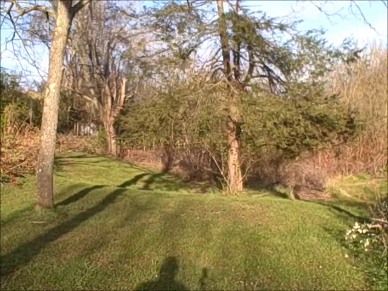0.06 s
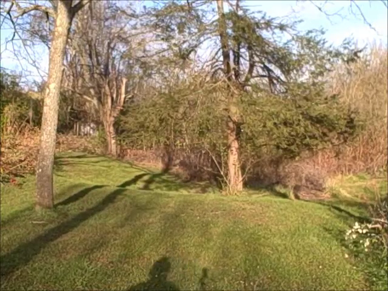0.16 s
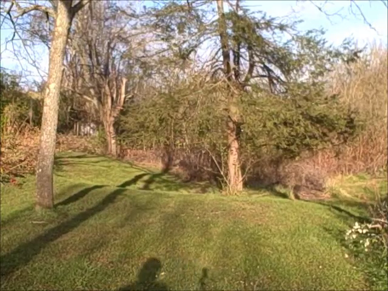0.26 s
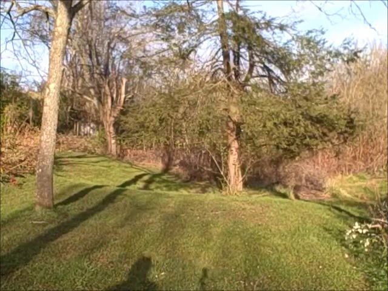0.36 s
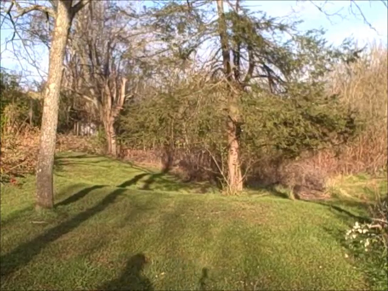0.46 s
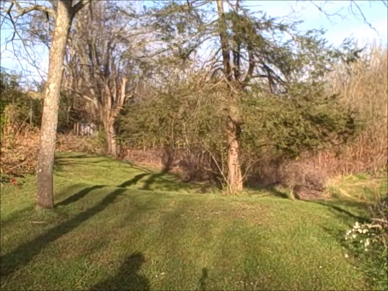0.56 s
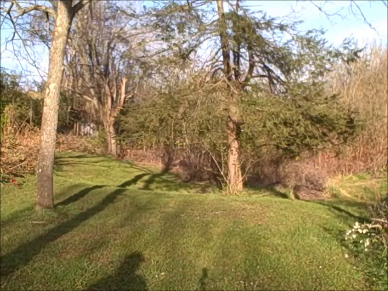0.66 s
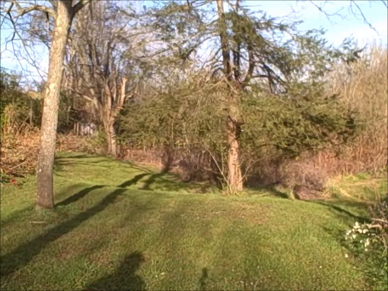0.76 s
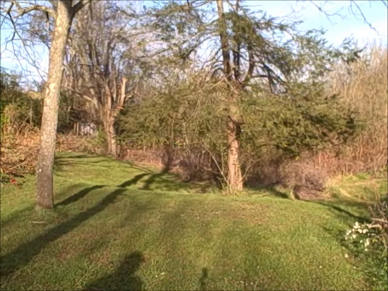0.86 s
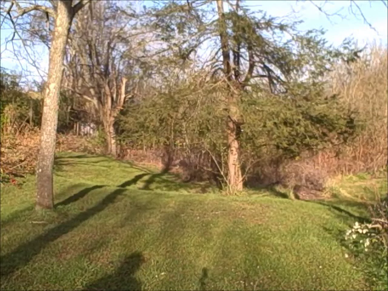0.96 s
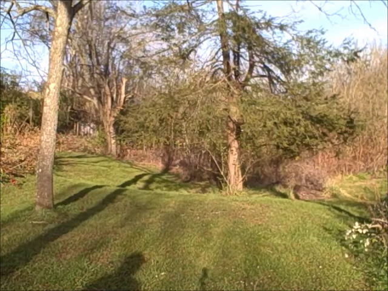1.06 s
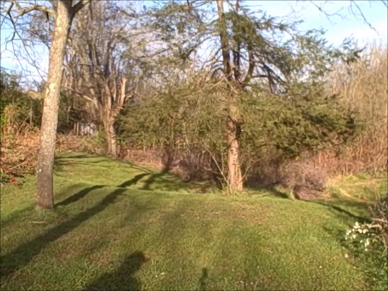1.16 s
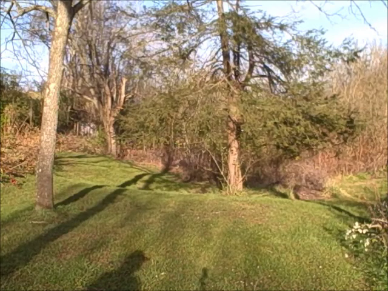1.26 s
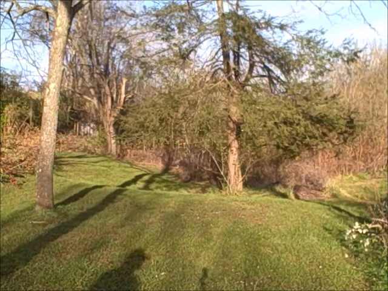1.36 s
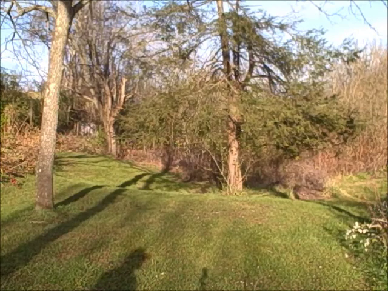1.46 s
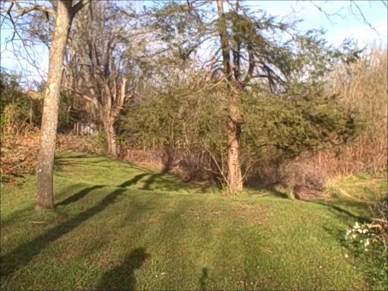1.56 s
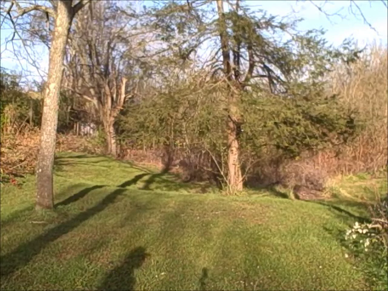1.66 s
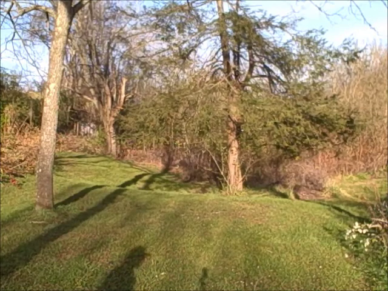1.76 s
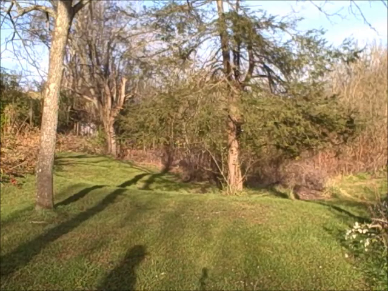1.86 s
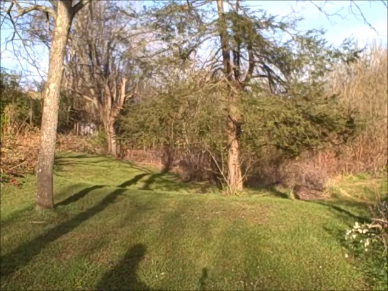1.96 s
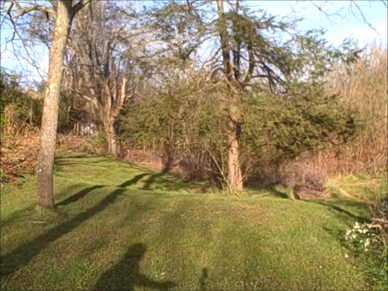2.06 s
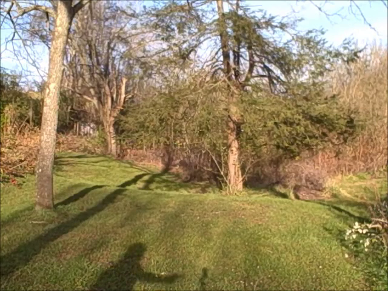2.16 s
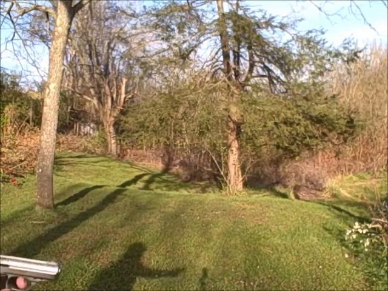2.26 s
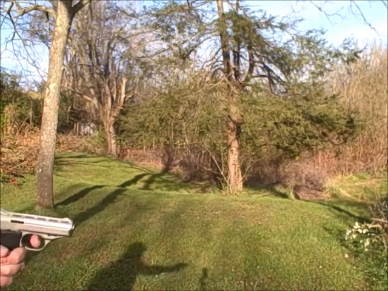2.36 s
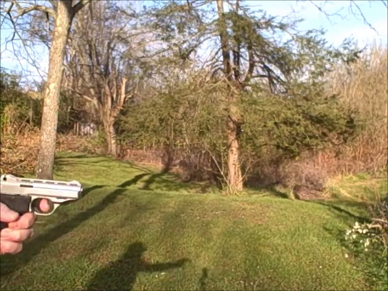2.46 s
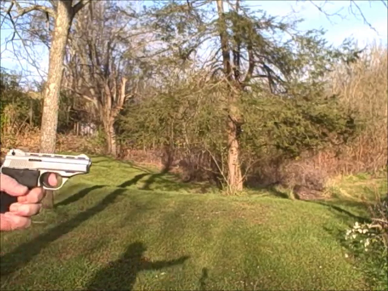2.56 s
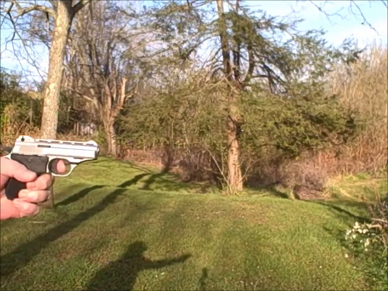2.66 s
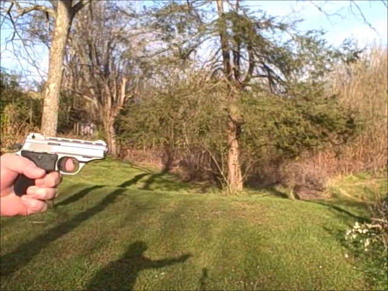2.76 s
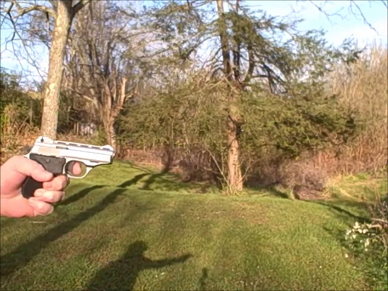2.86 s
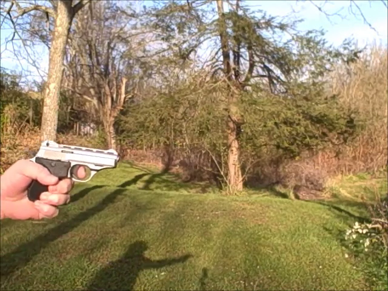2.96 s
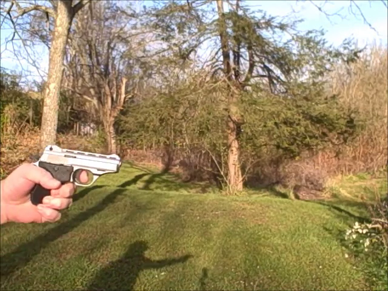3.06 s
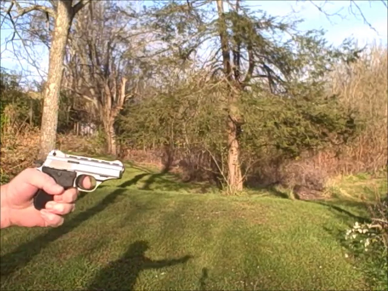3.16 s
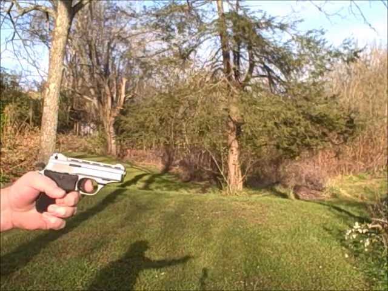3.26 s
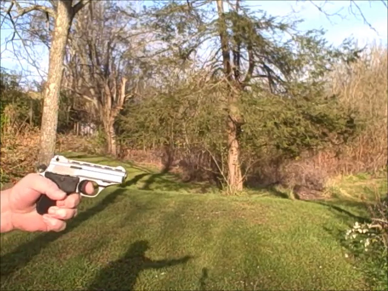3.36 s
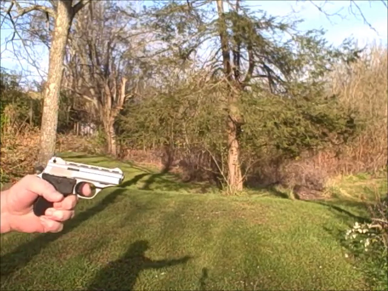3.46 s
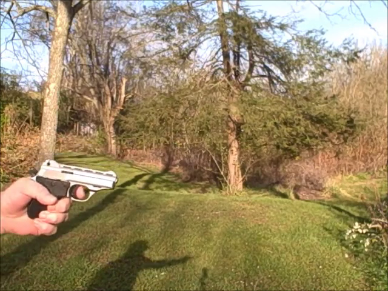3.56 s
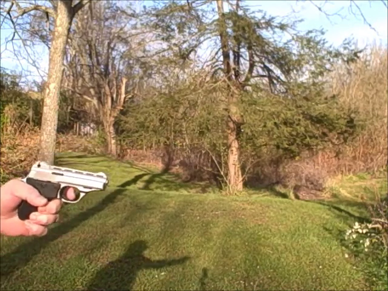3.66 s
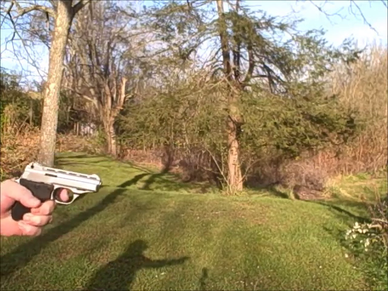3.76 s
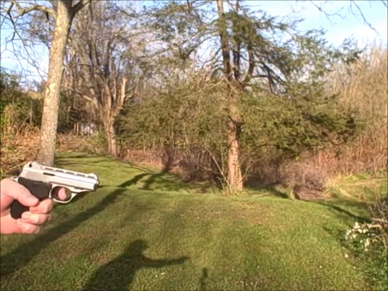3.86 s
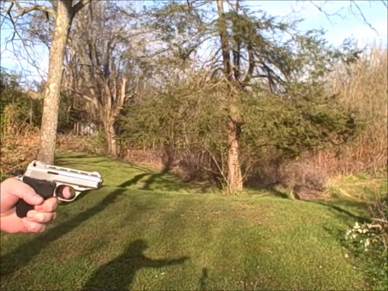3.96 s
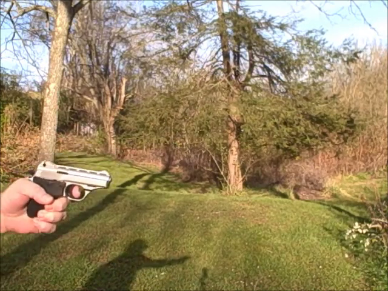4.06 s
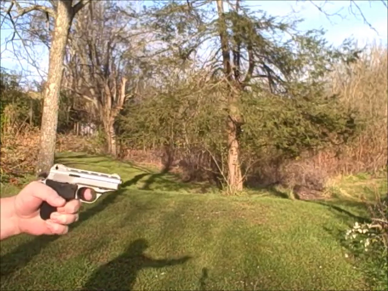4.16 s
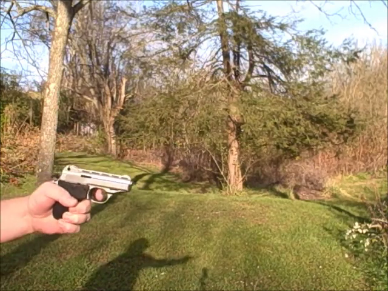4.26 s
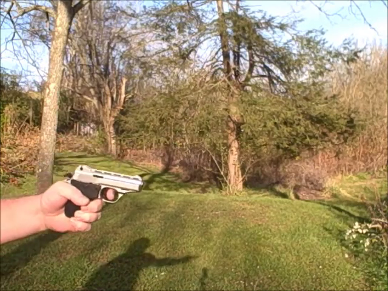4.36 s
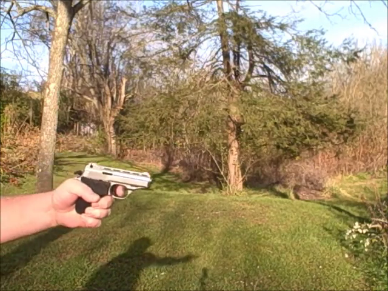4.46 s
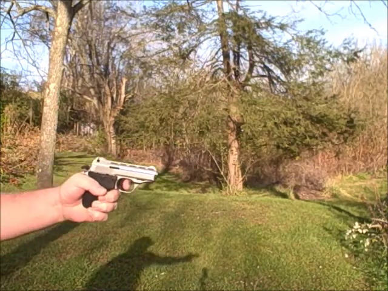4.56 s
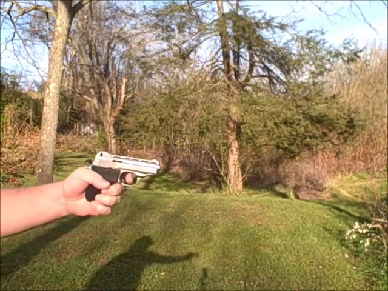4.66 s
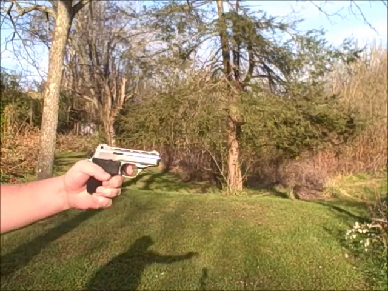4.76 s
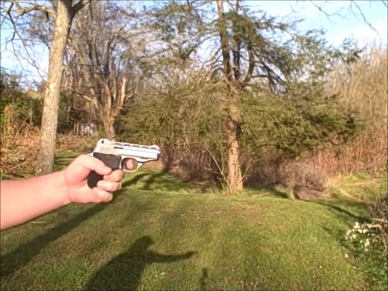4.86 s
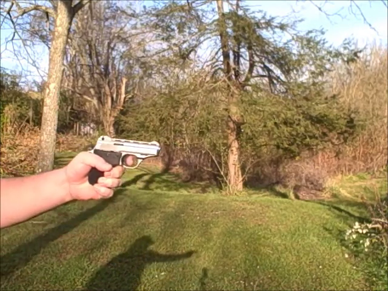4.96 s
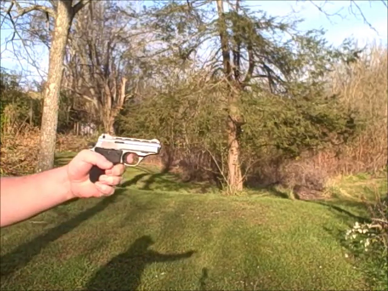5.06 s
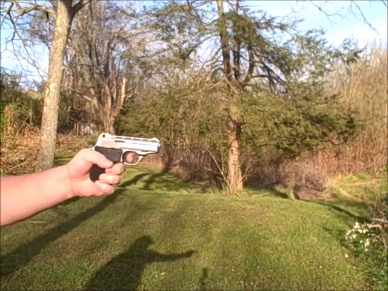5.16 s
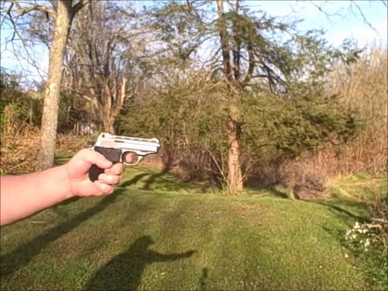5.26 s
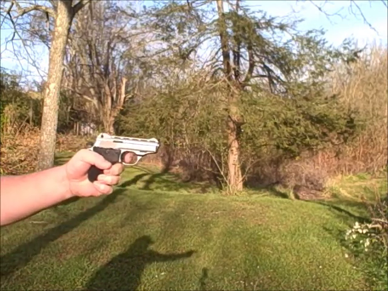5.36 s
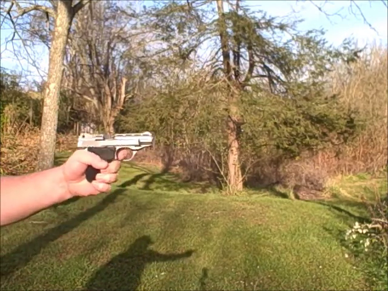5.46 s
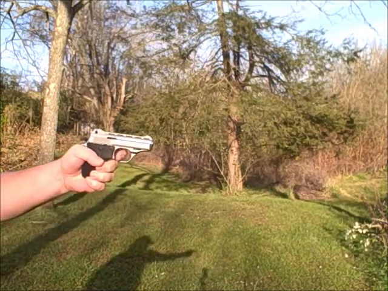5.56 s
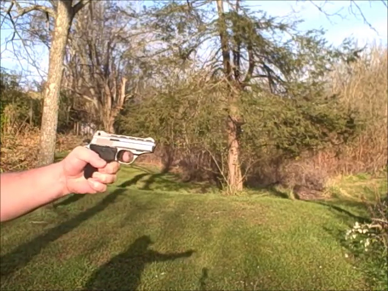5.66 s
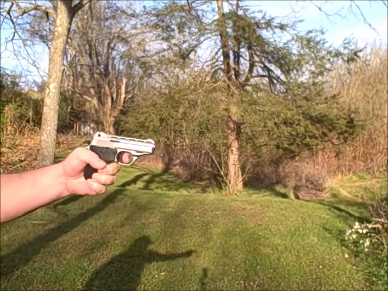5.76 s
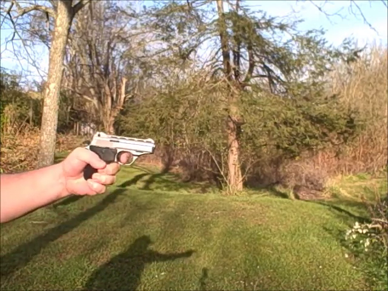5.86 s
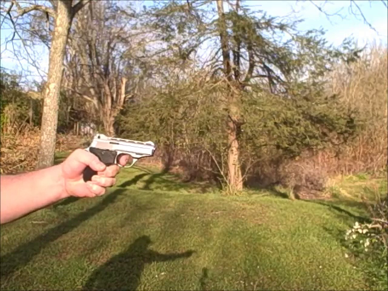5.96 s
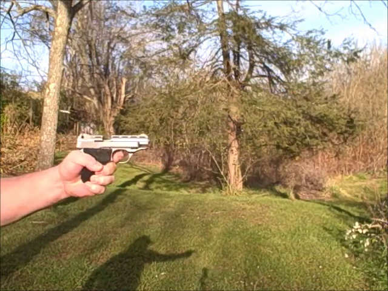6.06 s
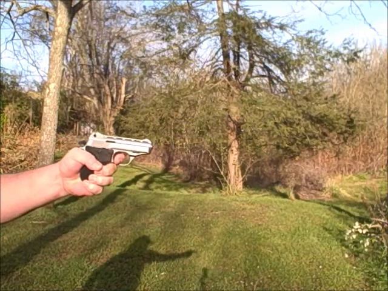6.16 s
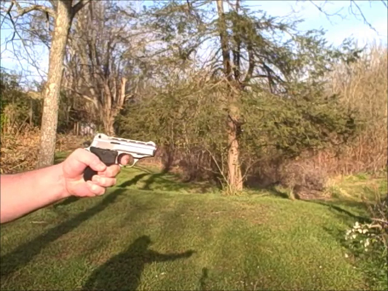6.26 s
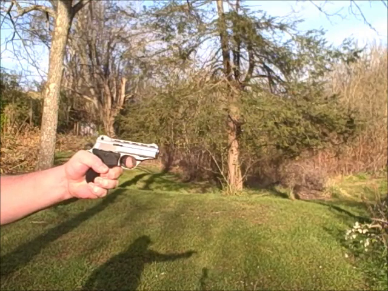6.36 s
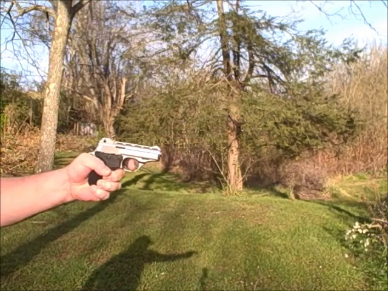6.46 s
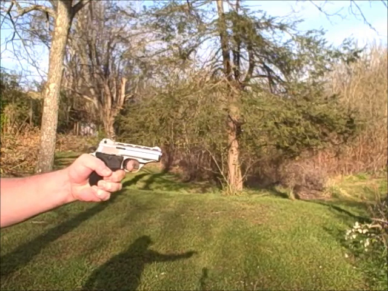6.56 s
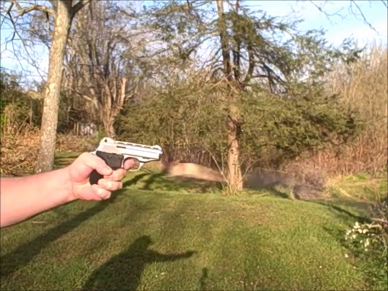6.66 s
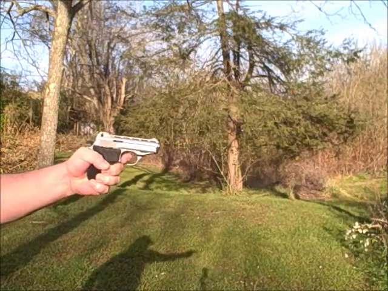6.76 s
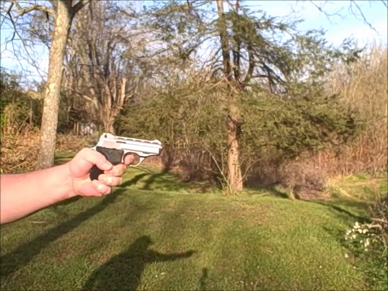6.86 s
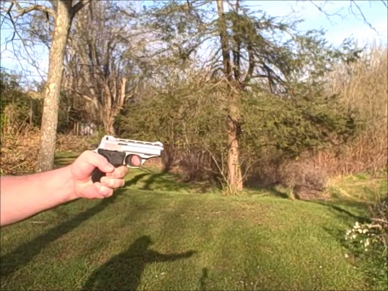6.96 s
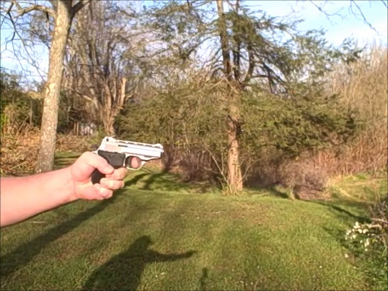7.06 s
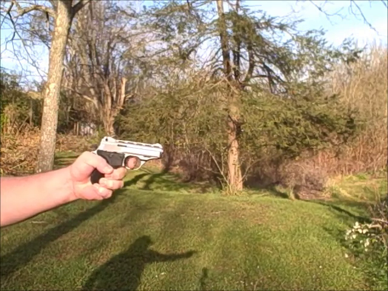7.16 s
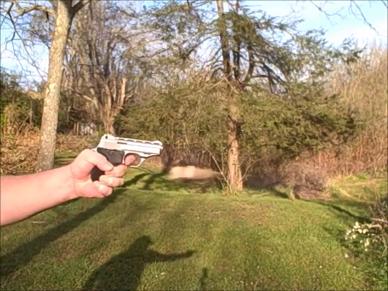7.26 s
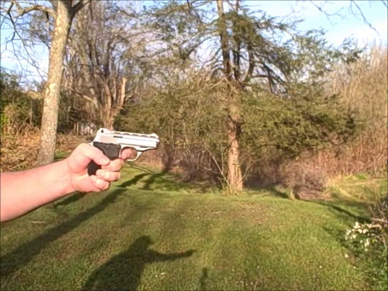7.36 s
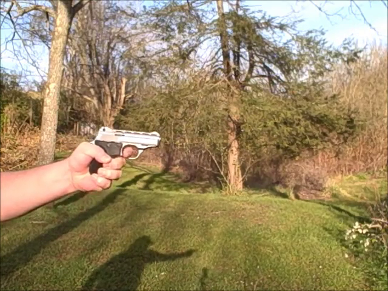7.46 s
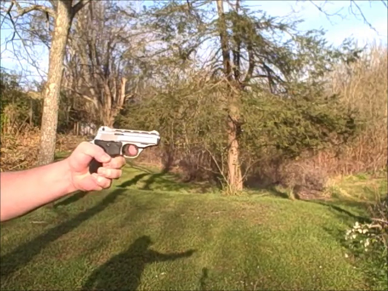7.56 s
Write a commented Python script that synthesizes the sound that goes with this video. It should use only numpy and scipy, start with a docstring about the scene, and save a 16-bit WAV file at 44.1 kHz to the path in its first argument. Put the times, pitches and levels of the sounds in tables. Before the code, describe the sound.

After faint rustling and clicks of handling, a small pistol fires four sharp shots outdoors, each trailing off in a short echo.

```python
"""Four pistol shots on a lawn

A lawn ringed by trees, one microphone an arm's length from a small pistol, an engine droning far off.
A sleeve rustles and the grip ticks and knocks as the gun is raised; then four blasts wake the same echoes.
The recorder overloads and its gain control ducks, so the first shot is the biggest."""
import sys
import numpy as np
from scipy import signal
from scipy.fft import rfft, irfft
from scipy.io import wavfile

SR = 44100
rng = np.random.default_rng(int(sys.argv[2]) if len(sys.argv) > 2 else 0)


def store_wav(level_fs):
    """Save 16-bit WAV to argv[1]."""
    pcm = np.round(np.clip(np.atleast_2d(level_fs), -1, 1) * 32767)
    wavfile.write(sys.argv[1], SR, pcm.T.astype(np.int16))


N = 335160
TIME = np.arange(N) / SR


def from_db(db):
    """Decibels to gain."""
    return 10 ** (np.asarray(db) / 20)


def rms_one(x):
    """Scale to unit rms."""
    return x / np.sqrt(np.mean(x ** 2) + 1e-20)


def at_hz(rows, hz):
    """Each column of a spectrum at the given frequencies."""
    points, *columns = np.transpose(rows)
    return [np.interp(np.log(hz + 1), np.log(points), c) for c in columns]


def cut(x, hz, kind="low", order=2):
    """Butterworth low- or high-pass."""
    return signal.sosfilt(signal.butter(order, hz, kind, fs=SR, output="sos"), x + 1e-18)


def tint(x, spectrum):
    """Give a noise the colour of a spectrum; rms 1."""
    level_db = at_hz(spectrum, np.arange(N // 2 + 1) * SR / N)[0]
    return rms_one(irfft(rfft(x) * from_db(level_db), N))


def grains(spread_db):
    """White noise made of many tiny impulses of unequal size."""
    sizes_db = spread_db * np.minimum(rng.standard_normal(N), 2)
    return rms_one(rng.standard_normal(N) * from_db(sizes_db))


def flicker(spread_db, top_hz):
    """A gain that wavers at random about 1."""
    return from_db(spread_db * rms_one(cut(rng.standard_normal(N), top_hz)))


def swell(centre_s, width_s):
    """A bell-shaped envelope."""
    return np.exp(-((TIME - centre_s) / width_s) ** 2 / 2)


def fade(t60, start=0):
    """An envelope that jumps to 1 and dies away."""
    return (TIME >= start) * from_db(-60 * np.maximum(TIME - start, 0) / t60)


def play(events, response):
    """One response, sounded at every (t/s, level/dB)."""
    out = np.zeros(N)
    for s, db in events:
        at = round(s * SR)
        out[at:] += from_db(db) * response[:N - at]
    return out


def far_engine():
    """A distant engine hums at its firing rate, slows and revs up again."""
    # engine speed and loudness: t/s, firing rate/Hz, level/dB
    revs = [(0, 56.5, -53.5), (.6, 55.2, -56), (1.05, 60.5, -55), (1.25, 62.6, -64), (1.7, 56.1, -58.5),
            (2.3, 53.2, -55), (3.0, 50.7, -51.5), (4.0, 47, -52), (4.85, 46.9, -50.5), (5.05, 56.5, -57),
            (5.45, 80, -59.5), (5.7, 84.8, -48), (7.6, 85.3, -44)]
    s, hz, db = np.transpose(revs)
    phase = 2 * np.pi * np.cumsum(np.interp(TIME, s, hz)) / SR
    return from_db(np.interp(TIME, s, db)) * np.sqrt(2) * np.sin(phase)


def open_air():
    """Low puffs and a soft rumble on the microphone, over the hush of the lawn."""
    # low puffs: t/s, level/dB
    puffs = [(.58, -56), (1.29, -49), (1.47, -57), (1.965, -44), (2.11, -47), (2.5, -46), (4.16, -49),
             (4.42, -51.5), (4.59, -42), (4.8, -52)]
    # spectrum of the still air: f/Hz, level/dB
    hush = [(41, -39.5), (70, -8.5), (174, -20.5), (195, -20.5), (233, -15.5), (268, -21.5), (314, -17.5),
            (351, -19.5), (566, -21.5), (1250, -24.5), (2600, -33.5), (12500, -45.5), (16000, -54)]
    envelope = from_db(-57.5) + sum(from_db(db) * swell(s, width_s=0.033) for s, db in puffs)
    rumble = rms_one(cut(cut(rng.standard_normal(N), 23), 12, "high"))
    return from_db(0.5) * envelope * rumble + from_db(-57) * tint(rng.standard_normal(N), hush)


def low_ring(start, hz, db, t60, swell_s):
    """A soft, hollow note rings briefly amid the rustling."""
    envelope = fade(t60, start) - fade(swell_s, start)
    return from_db(db) * np.sin(2 * np.pi * hz * (TIME - start)) * envelope


def stroke(start, length):
    """Speed of the cloth in one stroke: it builds (long strokes more slowly), slackens and dies away."""
    sag_db_per_s, t60 = 7.5, 0.25
    rise_s = min(0.067 + 0.07 * length, length)
    span = (TIME > start - 2 * rise_s) & (TIME < start + length + t60)
    age = TIME[span] - start
    rise = 0.5 + 0.5 * np.tanh(2 * age / rise_s - 1)
    release_db = 60 * np.maximum(age - length, 0) / t60
    speed = np.zeros(N)
    speed[span] = rise * from_db(-sag_db_per_s * np.maximum(age, 0) - release_db)
    return speed


def sleeve(snags_per_s, snag_db):
    """Close by, fibres catch, snag and slip: a crinkling swish above the duller rubbing of the folds."""
    # the arm rises and reaches out: t/s, length/s, swish level/dB, rubbing level/dB
    strokes = [(0.227, 0.046, -44, -53), (0.255, 0.25, -54.5, -58), (0.518, 0.037, -38.5, -47.5),
               (0.547, 0.26, -53.5, -59), (0.93, .21, -50, -53), (1.15, 0.22, -50.5, -59),
               (1.403, 0.12, -51, -65), (1.614, 0.074, -58, -64), (1.714, 0.056, -43, -59),
               (1.75, .12, -54.5, -55), (1.93, .122, -56.5, -55.5), (2.054, 0.16, -49.5, -48),
               (2.223, 0.24, -47.5, -51.5), (2.457, 0.463, -63.5, -72), (3.364, 0.18, -46.5, -56.5),
               (3.533, 0.2, -46, -55), (3.722, 0.72, -53, -57.5), (4.082, 0.019, -37.5, -56.5),
               (4.164, 0.078, -47, -67), (4.462, 0.06, -52, -57.5), (4.57, 0.17, -55.5, -56.5),
               (4.735, 0.075, -38.5, -46), (4.83, .24, -62.5, -63)]
    # spectrum of slipping fibres: f/Hz, level/dB
    swish_colour = [(880, -34), (1500, -10.5), (3180, -9), (4500, -9), (8000, -8), (9950, -4.5), (13100, 0),
                    (15100, -2), (16000, -13)]
    # spectrum of rubbing folds: f/Hz, level/dB
    rub_colour = [(150, -9.5), (300, -7.5), (450, -4.5), (650, -1), (850, -4.5), (1300, -9), (1900, -16.5),
                  (3000, -19), (4500, -22), (7000, -50)]
    power = sum((from_db([[swish_db], [rub_db]]) * stroke(start, length)) ** 2
                for start, length, swish_db, rub_db in strokes)
    swishing, rubbing = np.sqrt(power)
    swish = flicker(spread_db=2.13, top_hz=120) * tint(grains(spread_db=9.5), swish_colour)
    folds = from_db(1) * flicker(spread_db=3.6, top_hz=105) * tint(grains(spread_db=5), rub_colour)
    catches = [(s, snag_db) for s in TIME[rng.random(N) < snags_per_s / SR]]
    snags = play(catches, fade(t60=0.0082)) * tint(rng.standard_normal(N), swish_colour)
    snagging = np.minimum(swishing, from_db(-50.5))  # snags follow the swish up to a ceiling
    return swishing * swish + snagging * snags + rubbing * folds


def grip_ticks(lag_s):
    """Cloth and grip give bright ticks, each with a lower snap; the trigger only ticks."""
    # the sharpest catches of cloth and grip: t/s, tick level/dB, snap level/dB
    catches = [(0.176, -41, -69), (0.321, -32.5, -55), (0.415, -28, -48), (0.465, -35, -48),
               (0.7677, -36, -54), (1.1218, -40, -46.5), (1.1608, -27, -42.5), (1.2387, -36, -46.5),
               (1.4557, -38, -47), (1.4817, -23.5, -52), (1.5072, -31, -62), (1.53, -28, -57),
               (1.592, -34, -63), (1.919, -37.5, -63), (2.1147, -36, -46), (2.3192, -35, -49),
               (3.7329, -29.5, -46), (3.8454, -32.5, -54), (3.972, -35, -58), (4.0881, -24, -51),
               (4.237, -22.5, -66), (4.3894, -37.5, -54), (4.8528, -31, -53), (4.8968, -39, -61),
               (5.111, -50, -49.5), (5.1849, -37, -58)]
    # the trigger clicks back between shots: t/s, level/dB
    trigger = [(6.574, -33.5), (6.678, -38), (7.275, -42)]
    # spectrum of a tick: f/Hz, level/dB
    tick_colour = [(2000, -40), (5000, -12), (9000, -4.5), (13000, 3), (16000, 0.5)]
    # spectrum of a snap: f/Hz, level/dB
    snap_colour = [(500, 3), (1500, 0), (3000, -0.5), (5500, -7.5), (10000, -13)]
    bright = [(s + lag_s, db) for s, db, _ in catches] + trigger
    lower = [(s + lag_s, db) for s, _, db in catches]
    ticks = play(bright, fade(t60=0.01)) * tint(rng.standard_normal(N), tick_colour)
    snaps = play(lower, fade(t60=0.0093)) * tint(rng.standard_normal(N), snap_colour)
    return from_db(-0.5) * ticks + from_db(7.5) * snaps


def hand_knocks(lag_s):
    """The hand bumps the camera body; each dull knock rings its modes in a slightly different mix."""
    # knocks of the hand: t/s, level/dB
    knocks = [(0.317, -36.5), (1.055, -36.5), (1.123, -37.5), (1.457, -41), (1.69, -46.5), (1.816, -41),
              (1.872, -32), (2.208, -40), (2.352, -37.5), (3.712, -40), (4.127, -42), (4.37, -42.5),
              (4.66, -45), (5.035, -45), (5.11, -41.5)]
    # modes of the body: f/Hz, level/dB, t60/s
    modes = [(530, -5.5, 0.027), (620, -1, 0.023), (760, 2, 0.013), (1230, -23, .01), (1930, -29, 0.0062),
             (3160, -32, 0.0046)]
    out = np.zeros(N)
    for hz, mode_db, t60 in modes:
        blows = [(s + lag_s, db + rng.normal(0, 2.1)) for s, db in knocks]
        out += play(blows, from_db(mode_db) * np.sin(2 * np.pi * hz * TIME) * fade(t60))
    return from_db(-1) * out


def scatter(spectrum, build_up_s):
    """Countless small echoes build up; each frequency dies at its own rate."""
    hz, s, cells = signal.stft(tint(grains(spread_db=6.5), spectrum), SR, nperseg=256)
    t60 = at_hz(spectrum, hz)[1]
    tail = signal.istft(cells * from_db(-60 * s / t60[:, None]), SR)[1][:N]
    return tail * (1 - np.exp(-TIME / build_up_s))


def garden_echoes():
    """Bushes answer almost at once, the woods linger in clumps, and groups of trees return soft swells."""
    # scatter from the lawn and bushes nearby: f/Hz, level/dB, t60/s
    near_scatter = [(49.14, -25.5, 0.094), (150, -13.5, 0.28), (300, 2, 0.086), (700, 3.5, 0.15),
                    (1300, -0.5, 0.15), (2250, -6.5, 0.17), (3200, -15.5, 0.15), (6000, -20, 0.19),
                    (14900, -22.5, 0.16)]
    # scatter from the woods beyond: f/Hz, level/dB, t60/s
    far_scatter = [(40, -1.5, 1.4), (83, -3, 3.5), (163, -9, 0.63), (330, -6.5, 5.7), (632, -3.5, 4.7),
                   (990, -1.5, 3.3), (1290, -5, 2.5), (2112, -7.5, 1.82), (2860, -17.5, 1.77),
                   (3850, -10.5, 1.1), (5200, -16, 0.91), (8000, -15, 0.59), (15170, -21.5, 0.53)]
    # echoes from dense groups of trees: delay/s, level/dB, spread/s, cut-off/Hz
    groves = [(0.075, -29, 0.001, 2510), (0.1, -21, 0.0034, 2570), (.158, -27.5, 0.0055, 5000),
              (0.173, -22, 0.005, 3000), (0.223, -24.5, 0.0045, 5010), (.24, -23, 0.0045, 4000),
              (0.383, -18, 0.0012, 1070), (0.428, -27, 0.0018, 1188)]
    # spectrum of those echoes: f/Hz, level/dB
    grove_colour = [(100, -25), (220, -30), (400, 5), (900, 5.5), (2100, -4), (3000, -16), (6000, -20),
                    (15000, -51)]
    bushes = from_db(-0.5) * scatter(near_scatter, build_up_s=0.0034)
    woods = from_db(-24) * flicker(spread_db=0.5, top_hz=79) * scatter(far_scatter, build_up_s=0.078)
    twigs = tint(rng.standard_normal(N), grove_colour)
    trees = sum(from_db(db) * swell(delay, spread) * cut(twigs, top_hz)
                for delay, db, spread, top_hz in groves)
    return bushes + woods + trees


def muzzle_blast(suction_db, suction_s):
    """A steep push and a shallow pull, repeated by each hard surface; suction follows the gas cloud."""
    # direct path, then off shooter, ground, trunks and walls: delay/s, level/dB, push/s, cut-off/Hz
    paths = [(0, 23, 0.00061, 14000), (.003, 19.5, 0.00066, 5500), (.0048, 26.5, 0.00032, 5500),
             (.0065, 21.5, 0.0013, 5870), (.027, 6.5, 0.00027, 2980), (0.0287, 11, 0.0002, 2600),
             (0.0354, 7.5, .0003, 2580), (0.0454, -4.5, 0.00018, 3545), (.0722, 6, .00016, 1450),
             (.0744, 3, .00018, 1300), (.0757, 0, .00019, 1250), (.0985, -4.5, .0005, 1150),
             (0.1758, -6.5, 0.00033, 1200), (0.3791, -14.5, 0.00016, 1100), (0.382, -26.5, 0.0036, 129)]
    out = np.zeros(N)
    age = TIME[:SR // 20]
    for delay, db, push_s, top_hz in paths:
        at = round(delay * SR)
        pulse = (1 - age / push_s) * np.exp(-age / push_s)
        out[at:at + len(age)] += from_db(db) * cut(pulse, top_hz)
    return out - from_db(suction_db) * np.sin(np.pi * np.minimum(TIME / suction_s, 1))


def pistol():
    """The action snaps and gas bursts out; gun and trees stay put, so all shots share one echo pattern."""
    # the shots: t/s, level/dB
    shots = [(5.5671, 21), (6.1615, 18.5), (6.791, 17.5), (7.3915, 16)]
    # striker, firing pin, slide back, slide home: time from the blast/s, level/dB, t60/s
    action = [(-.004, -14.5, 0.0039), (-.0008, -0.5, 0.0082), (.008, 4, 0.014), (0.012, -6, .012),
              (.043, -21, 0.0087)]
    # spectrum of the clashing steel: f/Hz, level/dB
    steel_colour = [(800, -17.5), (2000, -1), (3800, -1.5), (5500, -7.5), (7500, 1), (11000, -1.5),
                    (16000, -1.5)]
    gas_jet = from_db(18.5) * rng.standard_normal(N) * fade(t60=0.0049)
    report = muzzle_blast(suction_db=-2, suction_s=0.0057) + gas_jet + garden_echoes()
    out = play(shots, report)
    steel = tint(grains(spread_db=9.5), steel_colour)
    for delay, part_db, t60 in action:
        out += steel * play([(s + delay, db + part_db) for s, db in shots], fade(t60))
    return out


def scene():
    """Pistol and handling at arm's length, the lawn behind, all at one microphone."""
    handling = sleeve(snags_per_s=16, snag_db=10.5)
    handling += grip_ticks(lag_s=0.000985) + hand_knocks(lag_s=0.00197)
    note = low_ring(start=0.6, hz=197.5, db=-42, t60=0.33, swell_s=0.077)
    return (pistol() + handling + note + far_engine() + open_air())[None]


def gain_control(x, threshold_db, depth_db, attack_s, release_db_per_s):
    """Loud peaks pull the gain down slowly; it creeps back more slowly still."""
    excess_db = np.clip(20 * np.log10(np.abs(x) + 1e-9) - threshold_db, 0, depth_db)
    recovery_db = release_db_per_s * TIME
    held_db = np.maximum.accumulate(excess_db + recovery_db) - recovery_db
    return x * from_db(-cut(held_db, 1 / (2 * np.pi * attack_s), order=1))


def bias_sag(x, limit_db, sag_db, recover_hz, coupling_hz):
    """Overload drags the amplifier's bias down; it swings back through the coupling capacitor."""
    choked = 1.0 * (np.abs(x) > from_db(limit_db))
    return -from_db(sag_db) * cut(cut(choked, recover_hz, order=1), coupling_hz, "high")


def overload(x, leak_db, leak_hz):
    """The wave is cut flat, yet a little of the lost treble leaks past the saturated stage."""
    flat = np.clip(x, -1, 1)
    return flat + from_db(leak_db) * np.tanh(cut(x - flat, leak_hz, "high"))


def record(dry):
    """The recorder: gain control, bias sag, circuit hiss, hard overload and a steep cut at 16 kHz."""
    x = gain_control(dry[0], threshold_db=-17, depth_db=19, attack_s=0.13, release_db_per_s=0.1)
    x += bias_sag(dry[0], limit_db=16.5, sag_db=2, recover_hz=21, coupling_hz=1.1)
    hiss = from_db(-71) * rng.standard_normal(N)
    x = overload(x + hiss, leak_db=-11, leak_hz=1950)
    top_cut = signal.ellip(10, 0.2, 70, 16000, fs=SR, output="sos")
    return signal.sosfilt(top_cut, x)[None]


dry = scene()
out = record(dry)
store_wav(out)
```